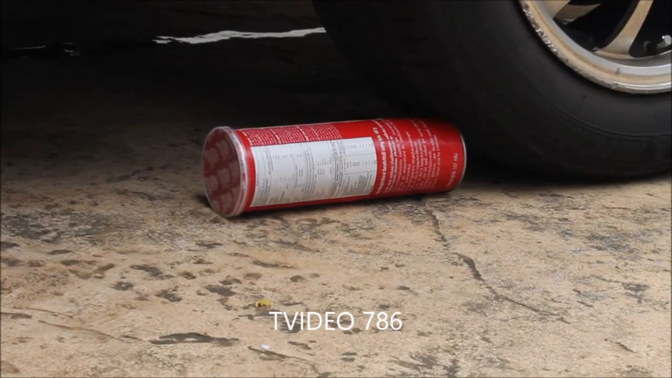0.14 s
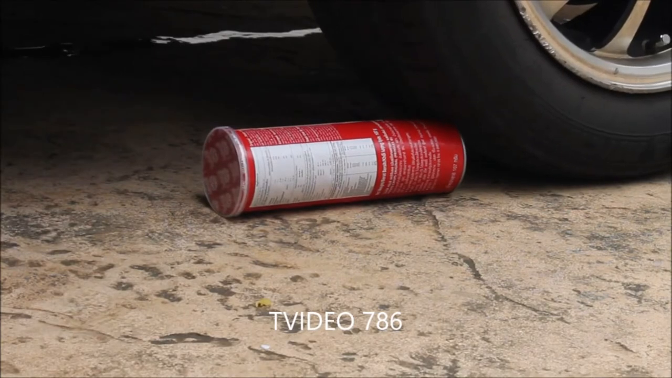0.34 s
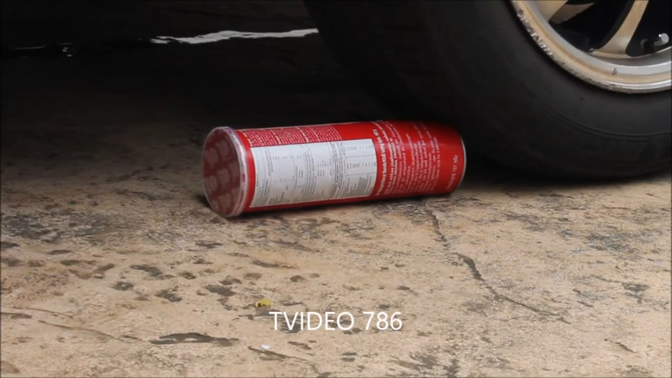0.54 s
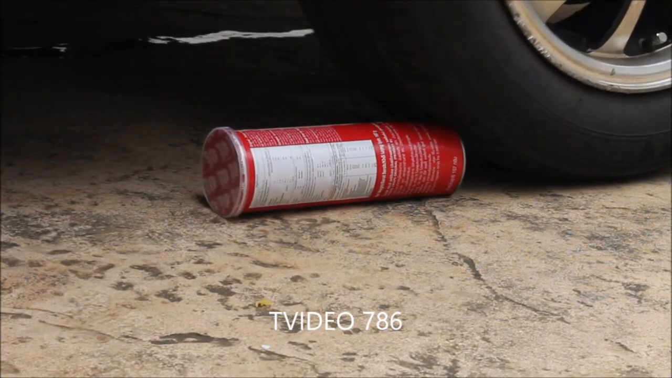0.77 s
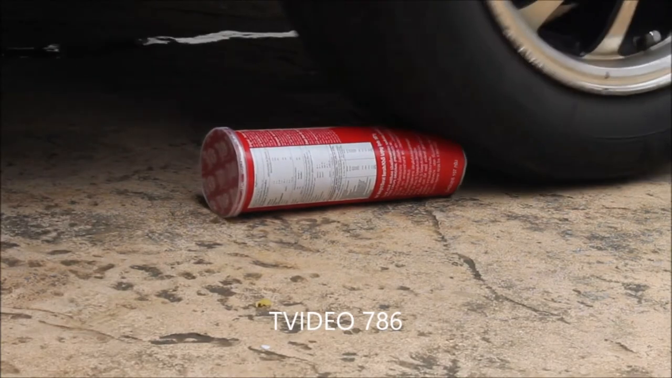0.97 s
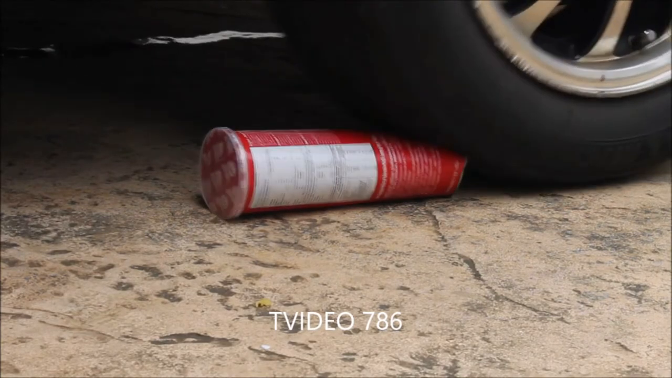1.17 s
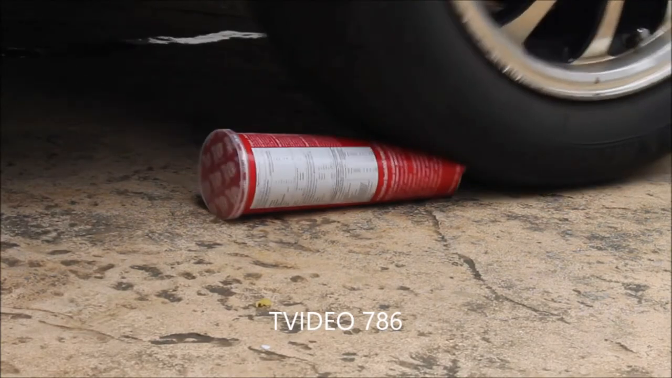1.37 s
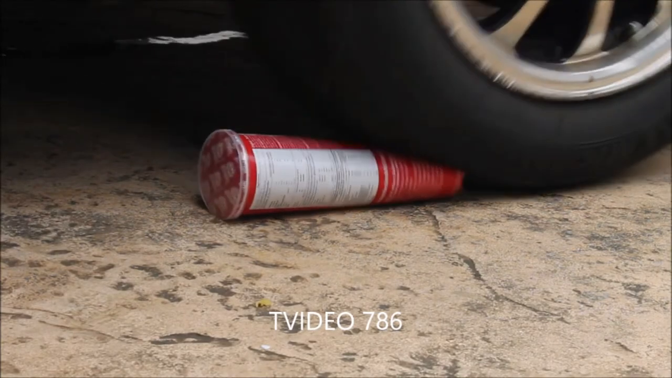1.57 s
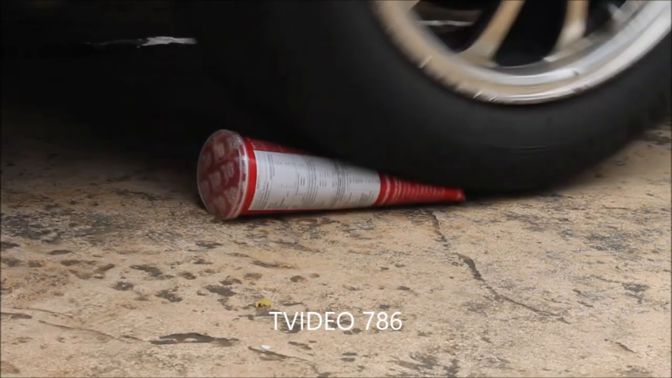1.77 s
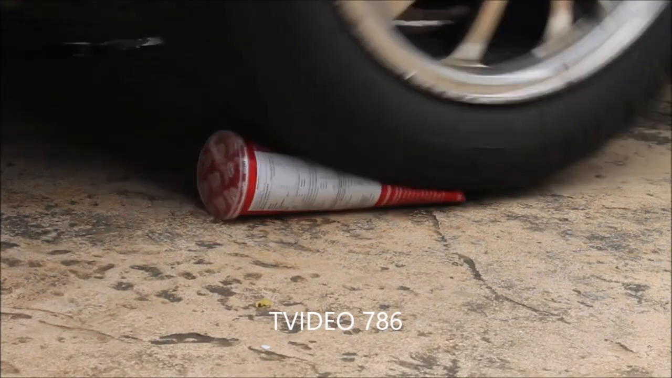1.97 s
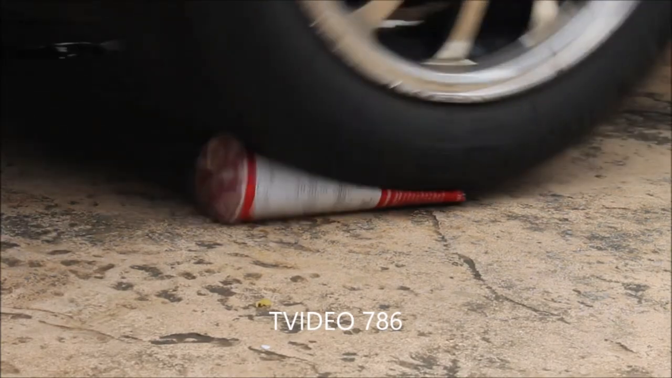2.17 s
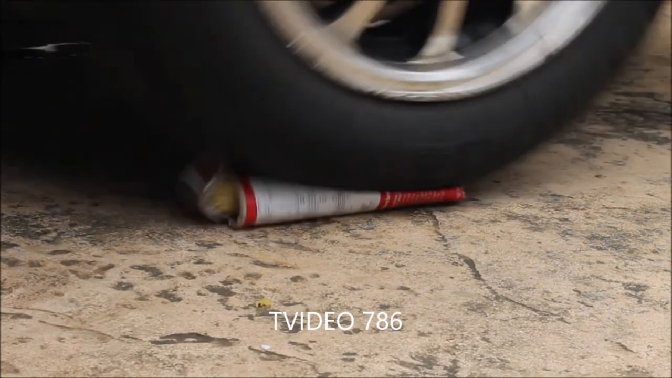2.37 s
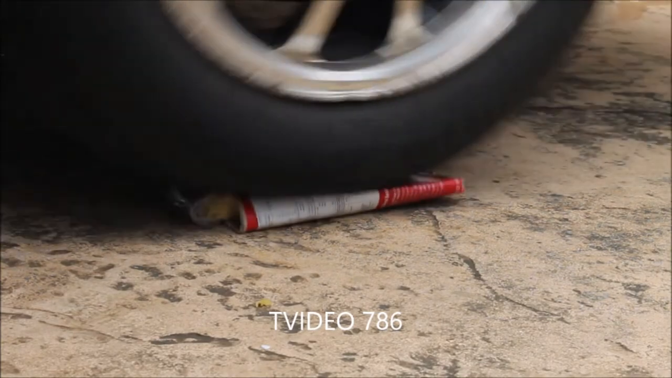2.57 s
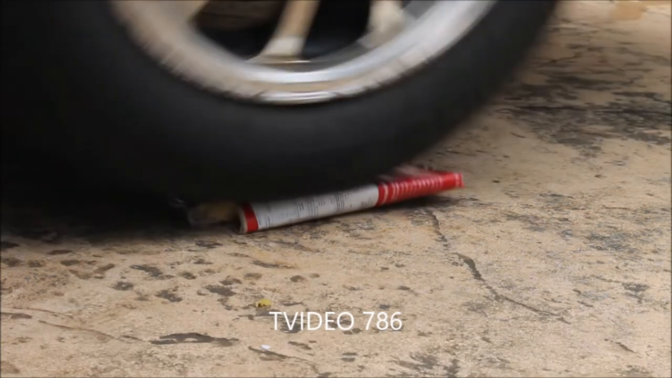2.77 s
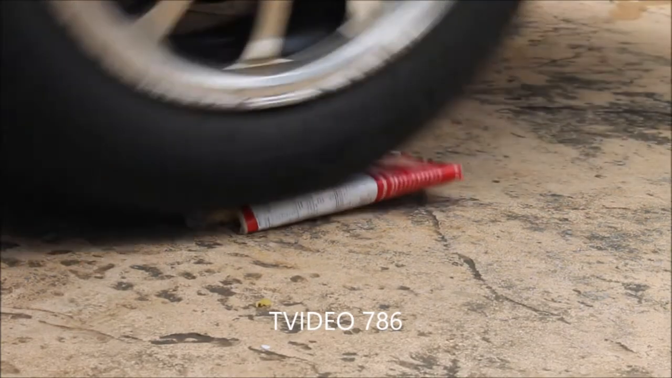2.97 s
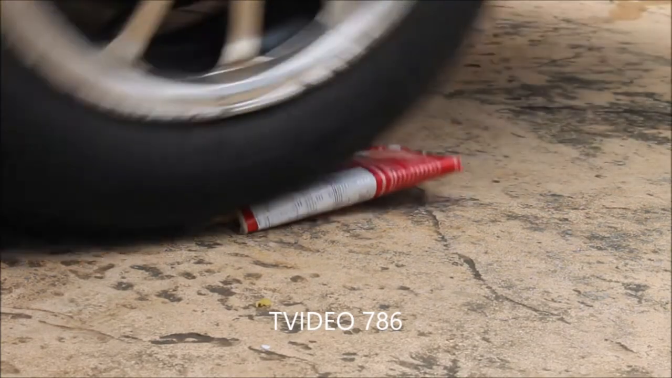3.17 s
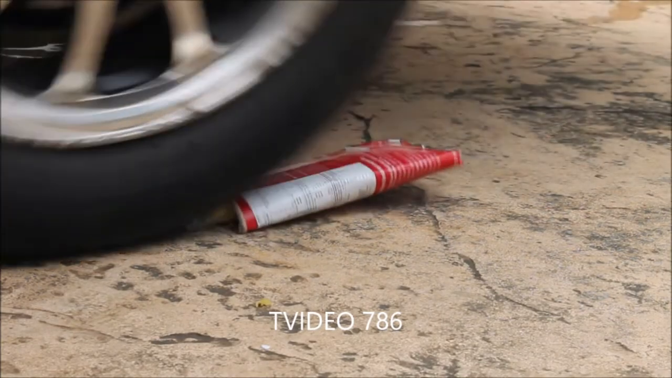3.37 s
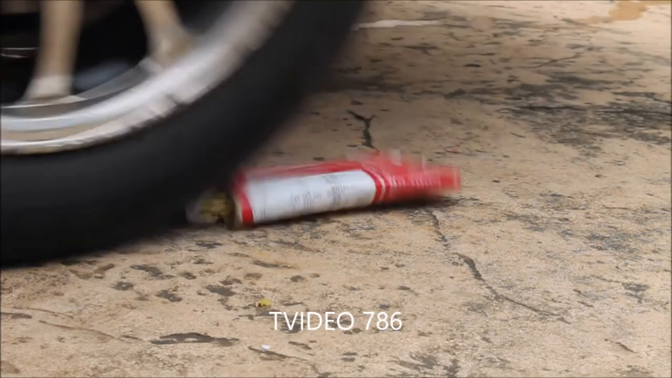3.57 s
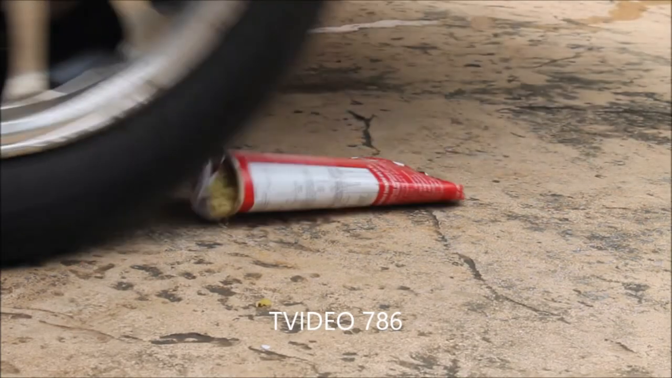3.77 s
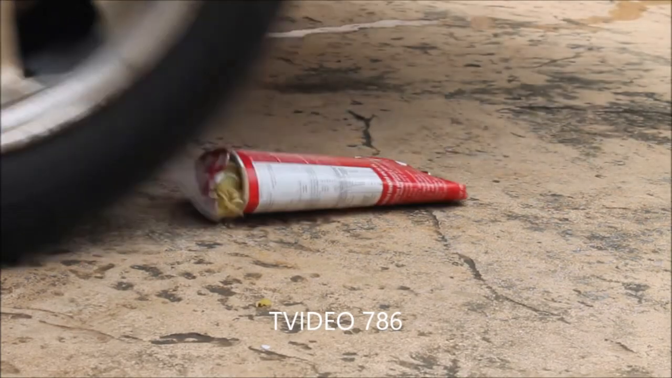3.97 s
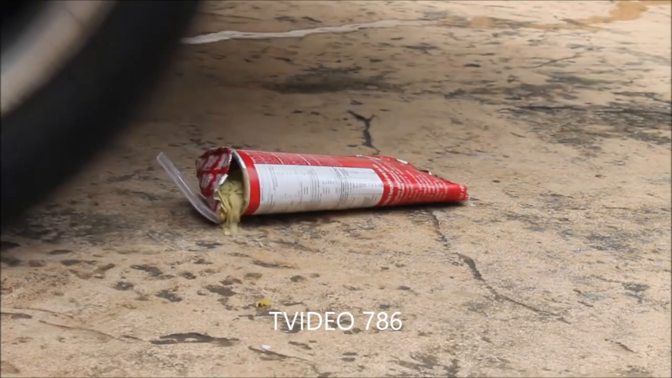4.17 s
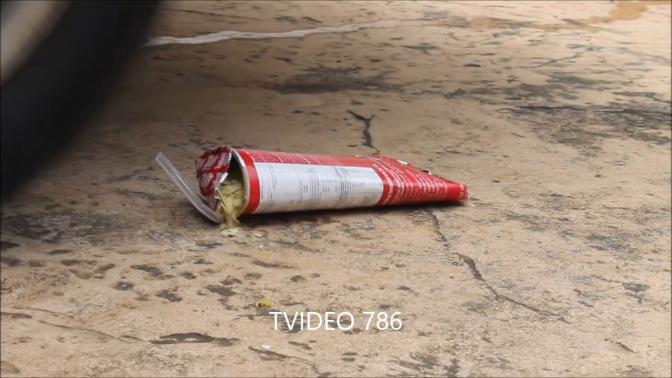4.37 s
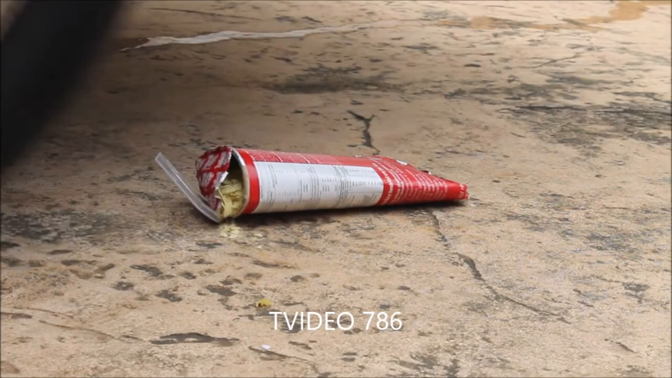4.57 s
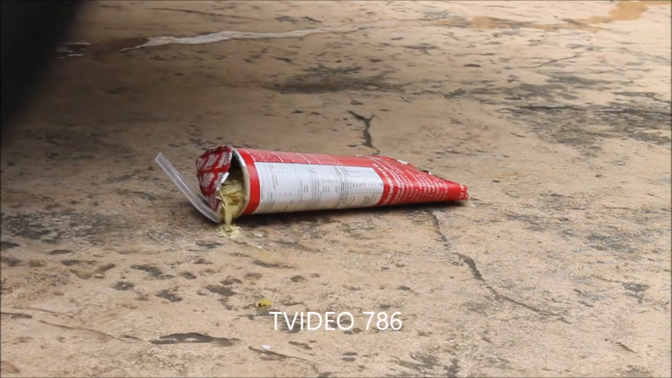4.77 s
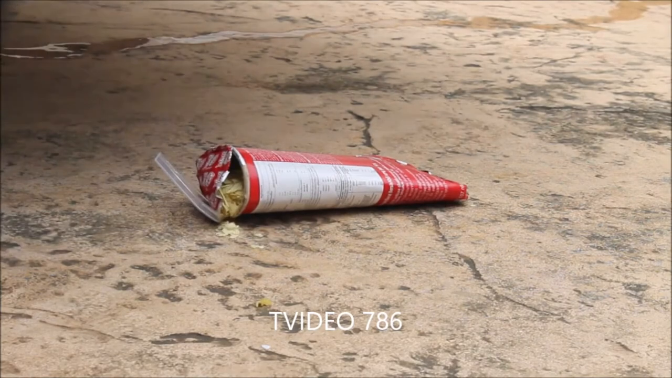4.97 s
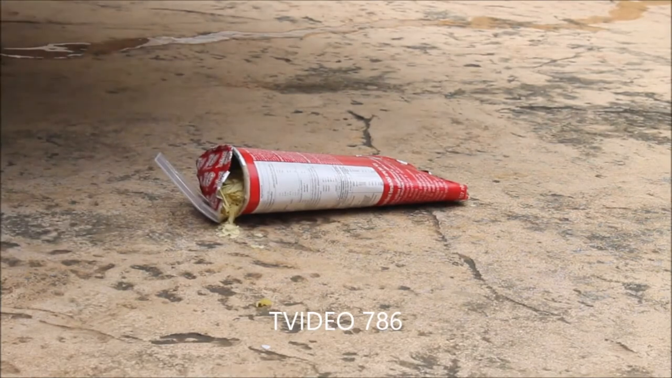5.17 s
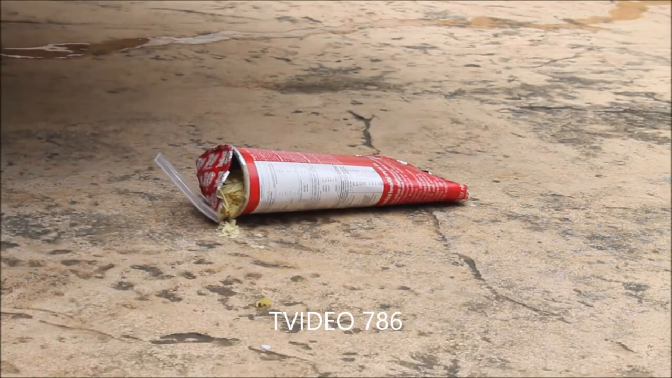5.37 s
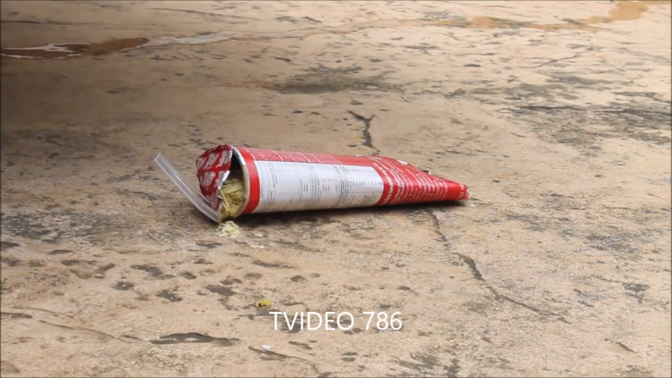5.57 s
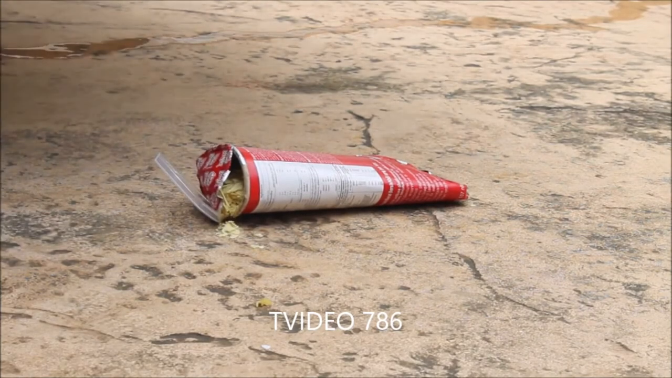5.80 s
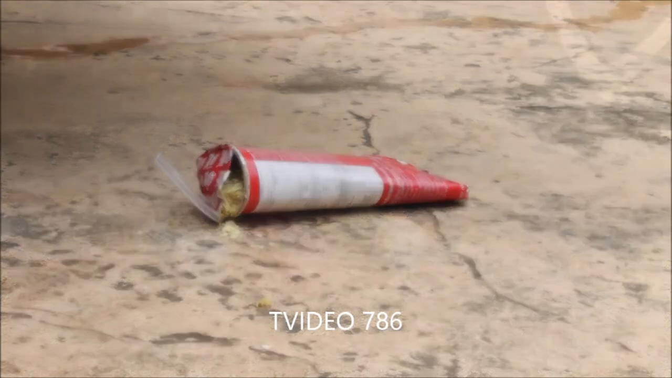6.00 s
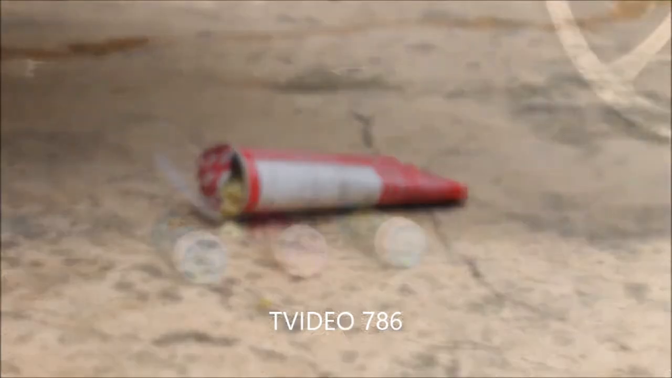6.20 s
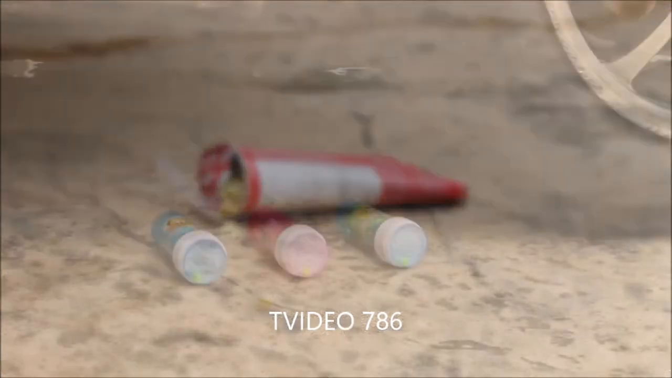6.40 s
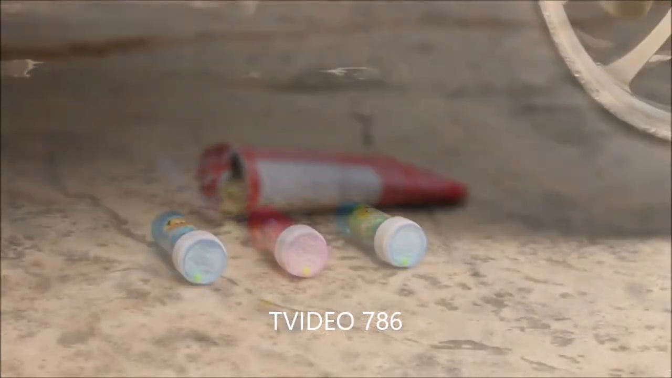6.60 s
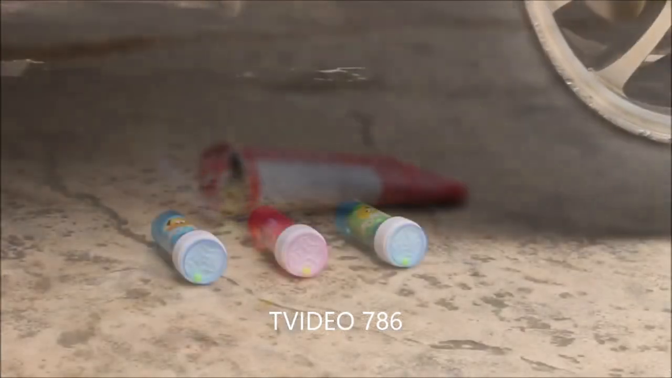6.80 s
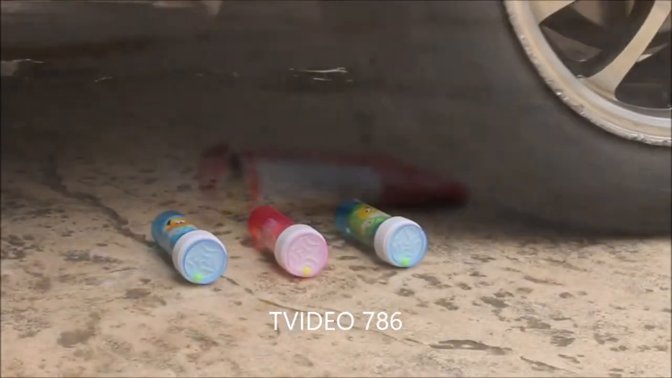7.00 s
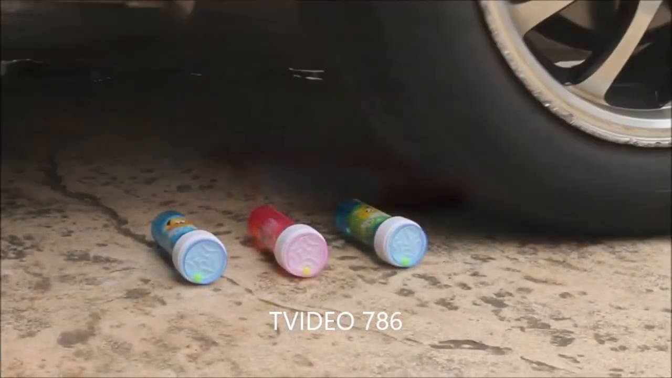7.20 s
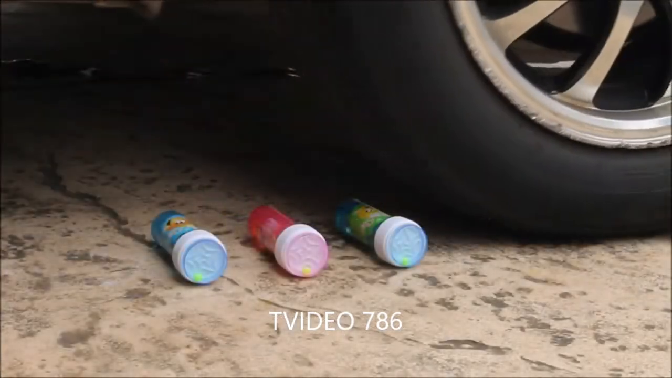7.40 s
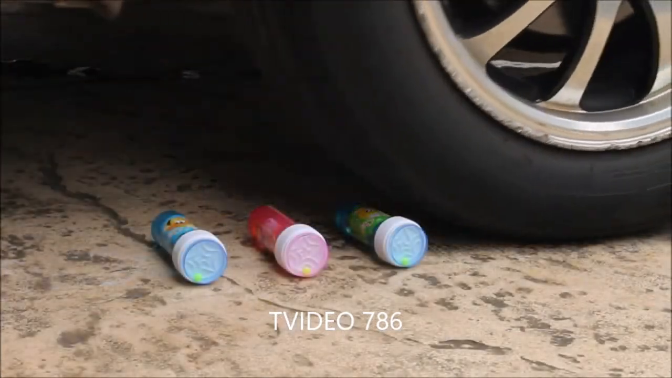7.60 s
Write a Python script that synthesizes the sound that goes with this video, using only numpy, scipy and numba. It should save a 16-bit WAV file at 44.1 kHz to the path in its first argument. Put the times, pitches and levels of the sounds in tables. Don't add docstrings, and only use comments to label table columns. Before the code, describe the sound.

Close outdoor sound, pitched down: muffled engine rumble, two early thuds of card, then sharp loud buckling as the tube collapses. Crisps fracture in a thick stream of crackles with snaps and gritty friction, becoming finer before fading. Brief hollow lid taps follow, then only low rumble. Near the end a full-speed idling engine's broadband fan noise starts suddenly and stays steady. The loudest cracks distort.

```python
import sys
import numpy as np
from scipy import signal
from scipy.fft import rfft, irfft
from scipy.io import wavfile
from scipy.ndimage import uniform_filter1d
from numba import njit

SR = 44100
rng = np.random.default_rng(int(sys.argv[2]) if len(sys.argv) > 2 else 0)


def decibels_to_gain(level_db):
    exponent = np.asarray(level_db, float) / 20
    return 10 ** exponent


def digitize_waveform(pressure):
    field = np.atleast_2d(pressure).T
    bounded = np.clip(field, -1, 1)
    quanta = np.round(bounded * 32767).astype(np.int16)
    wavfile.write(sys.argv[1], SR, quanta)


N = 337365
TIME = np.arange(N) / SR


def unit(x):
    return x / np.sqrt(np.mean(x ** 2))


def curves(table):
    s, *columns = np.transpose(table)
    return [np.interp(TIME, s, decibels_to_gain(c), 0, 0) for c in columns]


def ring(x, hz, width_hz):
    return signal.lfilter(*signal.iirpeak(hz, hz / width_hz, SR), x)


def noise_ring(hz, width_hz, second_width_hz):
    return unit(ring(ring(rng.standard_normal(N), hz, width_hz), hz, second_width_hz))


def walk(rate):
    k = int(SR / rate)
    held = np.repeat(rng.standard_normal(N // k + 1), k)[:N]
    return 1.37 * uniform_filter1d(uniform_filter1d(held, k), k)


def load():
    # t/s, level/dB, fine shards/dB re level
    on_wall = [
        (.7, -40, -23),
        (.99, -35, -11),
        (1.025, -21.5, -26),
        (1.09, -19.5, -28),
        (1.15, -23, -31.5),
        (1.21, -20, -41),
        (1.27, -23.5, -25),
        (1.36, -15, -22.5),
        (1.45, -19.5, -14),
    ]
    # t/s, level/dB, fine shards/dB re level
    on_crisps = [
        (1.699, -14, -10),
        (1.82, -14.5, -10),
        (1.93, -16.5, -14),
        (2.03, -14, -10.5),
        (2.279, -19.5, -4.5),
        (2.45, -19.5, -7),
        (2.6, -17, -5),
        (2.9, -19, -4),
        (3.41, -23, -8),
    ]
    # t/s, level/dB, fine shards/dB re level
    letting_go = [
        (3.46, -26, -13),
        (3.56, -48, -19),
        (3.68, -29.5, -21),
        (3.8, -49, -25),
        (3.88, -27.5, -26),
        (3.95, -37, -21),
        (4.1, -38, -18),
    ]
    level, fine = curves([*on_wall, *on_crisps, *letting_go])
    creases = level * decibels_to_gain(-9) * (fine + 1e-9) ** -0.41
    return creases, level, level * fine * decibels_to_gain(1.5)


def crack_rows():
    # t/s, peak/dB, ring f/Hz, snap/dB re peak, thump/dB re peak
    buckles = [(.399, -23, 470, -18, 0), (.748, -8, 396, -38, -6), (1.007, 1, 1063, -20, -1),
               (1.0122, 12, 897, -19, -6.5), (1.014, 9, 1443, -18, -5.5), (1.018, -1, 590, -24, -4),
               (1.069, -7.5, 670, -25, -1), (1.106, 1, 1104, -16, -10.5), (1.154, -6.5, 780, -20, -6),
               (1.233, 0, 1500, -26, -2.5), (1.343, -2, 1820, -21, -9), (1.36, -5, 880, -18, -15),
               (1.404, -3.5, 476, -17.5, -10), (1.4191, 0, 1130, -14, -3.5), (1.4232, 4, 1376, -8, -10),
               (2.261, -6, 276, -23, -7), (2.408, 0, 400, -9, -8), (2.421, -13, 320, -16, 10.5)]
    # t/s, peak/dB, ring f/Hz, snap/dB re peak
    stacks = [(1.566, 1.5, 1434, -17), (1.649, 2, 1133, -21), (1.691, 0, 991, -14), (1.763, -13, 517, -22),
              (1.818, -4, 780, -22), (1.91, -6, 506, -18), (1.977, -3, 674, -20), (2.094, 3, 638, -28),
              (2.145, -13, 708, -17), (2.19, -7, 576, -13), (2.247, 0, 1610, -18), (2.284, -1, 1300, -17),
              (2.316, -16, 1040, -10), (2.339, 1, 1800, -15), (2.363, -7.5, 842, -14),
              (2.405, -2, 456, -19), (2.454, -12, 960, -19), (2.493, -17, 993, -20),
              (2.516, -15, 1060, -16), (2.538, -4.5, 644, -17), (2.585, 1, 1646, -19),
              (2.635, -4, 700, -18), (2.693, -15, 754, -15), (2.798, -0.5, 700, -14), (2.953, -8, 573, -16),
              (3.001, -10.5, 813, -20), (3.039, -3, 1210, -21), (3.081, 3, 1290, -27),
              (3.396, -12, 667, -13), (3.474, -11, 471, -25)]
    # t/s, peak/dB, ring f/Hz, snap/dB re peak, thump/dB re peak
    lid_drops = [
        (3.616, -7.5, 1400, -19, -7),
        (3.626, -25, 2300, -8, -8),
        (3.662, -9, 1290, -15, -15),
        (3.679, -20, 1800, -9, -3),
        (3.847, -5, 750, -28, -3),
        (3.865, -12.5, 603, -22, -1),
        (3.885, -16, 1700, -25, 1),
    ]
    buckle_t60_s, lid_t60_s, crack_t60_s = 0.031, 0.024, 0.029
    crack_gain_db, crack_snap_db, crack_thump_db = -1.5, 7, -24
    count, from_s, to_s = 45, 1.47, 3.55
    chance = rng.random((count, 4)).T
    small_s = from_s + (np.arange(count) + chance[0]) / count * (to_s - from_s)
    load_db = 20 * np.log10(load()[1][(small_s * SR).astype(int)] + 1e-9)
    small_db = load_db + 8 - 3 * (2 * chance[1] - 1)
    small_hz = 450 * 3.5 ** chance[2]
    small_snap_db = -15 + 6 * (chance[3] - .5)
    small = zip(small_s, small_db - crack_gain_db, small_hz, small_snap_db)
    rows = [(*r, buckle_t60_s) for r in buckles] + [(*r, lid_t60_s) for r in lid_drops]
    for s, db, hz, snap_db in [*stacks, *small]:
        rows.append((s, db + crack_gain_db, hz, snap_db + crack_snap_db, crack_thump_db, crack_t60_s))
    return rows


def cracks():
    out, t = np.zeros(N + SR), TIME[:SR // 4]
    for s, db, hz, snap_db, thump_db, t60 in crack_rows():
        tear = rng.standard_normal((3, len(t)))
        fall = np.exp(-np.log(1000) * t / max(t60, .003))
        impact = .09 / t60 * np.sign(tear[0, 0]) * np.exp(-t / .00012)
        blow = tear[0] * fall + impact
        wall = ring(ring(blow, hz, .55 * hz) + .35 * ring(blow, 1400, 1800), 1.1 * hz, 1.6 * hz)
        snap = ring(blow * fall, 2500, 2900) + .15 * ring(tear[1] * fall, 4500, 3000)
        thump = ring(ring(tear[2] * fall ** .5, 210, 390), 210, 390)
        levels = (db, db + snap_db, db + thump_db - 0.5)
        burst = sum(decibels_to_gain(g) * p / abs(p).max() for p, g in zip((wall, snap, thump), levels))
        out[int(s * SR):int(s * SR) + len(t)] += burst
    return out[:N]


@njit
def rattle(count, start, pole, size):
    out = np.zeros(count)
    for k in range(len(start)):
        z, i = 1. + 0j, start[k]
        while abs(z) > .003 and i < count:
            out[i] += size[k] * z.imag
            z, i = z * pole[k], i + 1
    return out


def crush():
    # lowest f/Hz, highest f/Hz, rate/(1/s), decay/cycles, size spread/dB
    families = [
        (204, 950, 800, 2.4, 1),
        (821, 2526, 2000, 1.9, 2.5),
        (2300, 5900, 3000, 3.0, 5),
    ]
    stress_db = 1.76 * walk(45) + 2.3 * walk(220)
    out = 0
    for (lo, hi, rate, cycles, spread_db), gain in zip(families, load()):
        chance = rng.random((11000, 4)).T
        start = (SR * (.6 + np.cumsum(-np.log(chance[0]) / rate))).astype(int)
        hz = lo * (hi / lo) ** chance[1]
        pole = np.exp(hz / SR * (2j * np.pi - 1 / (cycles * (0.14 + chance[2]))))
        size = decibels_to_gain(-spread_db * np.log(chance[3]) + stress_db[np.minimum(start, N - 1)])
        sign = np.sign(chance[3] * 1000 % 1 - .5)
        bed = rattle(N, start, pole, size * sign)
        bed = 5 * np.tanh(bed / np.std(bed[SR:4 * SR]) / 5)
        out = out + gain * bed
    return out


def grind():
    card, level, fine = load()
    dust = unit(ring(rng.standard_normal(N), 1800, 980)) * decibels_to_gain(2.4 * walk(30))
    flex = noise_ring(95, 87, 87) * decibels_to_gain(-15.5)
    rub = noise_ring(750, 610, 1220) * decibels_to_gain(-5.5 + 1.3 * walk(40))
    return fine * dust + level * flex + card * rub


def roar(colour, rings, lo_hz, hi_hz, flicker_db):
    hz = np.fft.rfftfreq(N, 1 / SR) + 1
    colour_hz, colour_db = np.transpose(colour)
    shape = decibels_to_gain(np.interp(np.log(hz), np.log(colour_hz), colour_db))
    wave = rfft(rng.standard_normal(N)) * shape
    scale = np.sqrt(np.mean(irfft(wave * (hz > lo_hz) * (hz < hi_hz), N) ** 2))
    octave = np.log2(hz / 30)
    out = 0
    for k in range(10):
        band = irfft(wave * np.clip(1 - abs(octave - k), 0, 1), N)
        out = out + band * decibels_to_gain(flicker_db * walk(14))
    panels = sum(decibels_to_gain(db) * unit(ring(rng.standard_normal(N), f, w)) for f, w, db in rings)
    return out / scale + panels


def slow_engine():
    # f/Hz, density/dB per Hz
    colour = [(41, -45.5), (70, -7.5), (205, -6), (229, -7.5), (326, -6.5), (423, -10), (602, -11),
              (649, -11.5), (795, -12.5), (1200, -16.5), (1700, -18.5), (3260, -28), (5900, -43),
              (7670, -79.5), (13000, -120)]
    # f/Hz, width/Hz, level/dB
    panels = [
        (190, 23, -12.5),
        (261, 35, -20),
        (478, 32, -11.5),
    ]
    # t/s, level/dB
    nearness = [(0, -29), (.5, -26), (.9, -24), (1.5, -25.5), (2.2, -26.5), (3.4, -25), (4.2, -27),
                (5.1, -29), (6.0, -29), (6.6, -31), (7.4, -32), (7.52, -50), (7.65, -66)]
    near = curves(nearness)[0]
    boom = noise_ring(43.7, 18, 18)
    boom_db = -2 - .5 * TIME + 2.3 * walk(2.7)
    noise = roar(colour, panels, 54, 440, flicker_db=1.1)
    hiss = signal.lfilter(*signal.butter(1, 700, "high", fs=SR), noise)
    return near * (decibels_to_gain(boom_db) * boom + noise - hiss + decibels_to_gain(-6) * unit(hiss))


def fast_engine():
    # f/Hz, density/dB per Hz
    colour = [(18, -45), (30, -10), (65, -20), (87, -7.5), (138, -7), (198, 2), (226, -4.5), (350, -15.5),
              (453, -4.5), (587, -12), (686, -7), (1310, -10), (1930, -12), (7800, -26.5), (14500, -31.5)]
    # f/Hz, width/Hz, level/dB
    panels = [
        (171, 26, -19),
        (517, 33, -26.5),
        (1084, 17, -11.5),
        (1310, 36, -10),
    ]
    cut_in_s, level_db, bump_db, bump_s = 6.033, -28, 0.5, 0.035
    since = TIME - cut_in_s
    gain = (since > 0) * decibels_to_gain(level_db + bump_db * np.exp(-abs(since) / bump_s))
    return gain * roar(colour, panels, 590, 9000, flicker_db=1.55)


def scene():
    slow = slow_engine() + decibels_to_gain(-2) * crush() + cracks() + grind()
    slow = slow - 0.27 * ring(slow, 2560, 340)
    overload = .97
    slow = slow / (1 + (slow / overload) ** 4) ** .25
    shifted_top_hz = 6400
    edge = signal.cheby2(22, 90, shifted_top_hz, fs=SR, output="sos")
    return (signal.sosfilt(edge, slow) + fast_engine())[None]


def coarse(x, step):
    hz, t, lines = signal.stft(x, SR, "cosine", nperseg=2048)
    step_db = np.interp(hz, *np.transpose(step))[:, None] + 1.4 * rng.standard_normal(len(t))
    size = abs(lines) + 1e-12
    grid = uniform_filter1d(size, size=61, axis=0) * decibels_to_gain(step_db)
    rounded = grid * np.floor(size / grid + 0.32)
    error = lines * (rounded / size - 1) * (step_db > -15)
    return x + signal.istft(error, SR, "cosine", nperseg=2048)[1][:N]


def band_limit(x):
    return signal.sosfilt(signal.butter(12, 15700, fs=SR, output="sos"), x)


def record(dry):
    # t/s, length/s, share/1
    starved = [(.088, .024, .7), (.192, .016, .8), (.237, .022, .65), (.385, .02, .8), (.729, .022, .97),
               (1.068, .03, .8), (1.6, .02, .7), (3.03, .025, .6), (3.18, .03, .6), (3.42, .025, .6),
               (3.455, .025, .75), (3.947, .016, .85), (4.205, .02, .8), (4.33, .045, 1), (4.49, .016, .8),
               (4.63, .025, .9), (5.036, .04, 1), (6.06, .03, .85), (6.51, .03, .75), (6.625, .05, .88),
               (6.765, .025, .7), (6.83, .025, .65), (7.575, .02, .65)]
    # f/Hz, step/dB
    frayed_top = [(8500, -16), (10000, 4), (12000, 8), (14000, 11), (14700, 13), (14900, 60)]
    # f/Hz, step/dB
    starved_top = [(1700, -16), (2400, 8), (5000, 10.5), (7000, 15), (14700, 18), (14900, 60)]
    short = sum(share * np.clip(2 - abs(TIME - s) * 4 / length, 0, 1) for s, length, share in starved)
    x = (1 - short) * coarse(dry[0], frayed_top) + short * coarse(dry[0], starved_top)
    return band_limit(np.clip(x, -1, 1)[None])


dry = scene()
out = record(dry)
digitize_waveform(out)
```